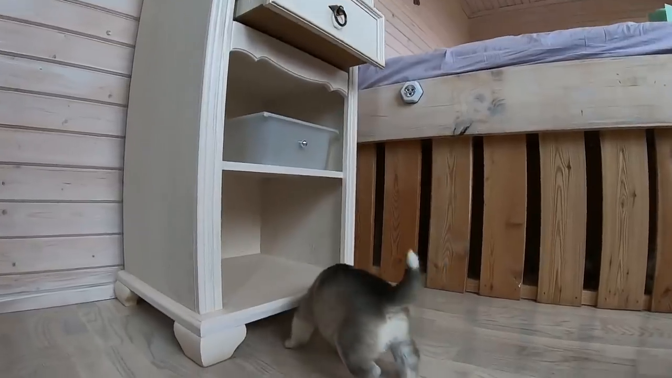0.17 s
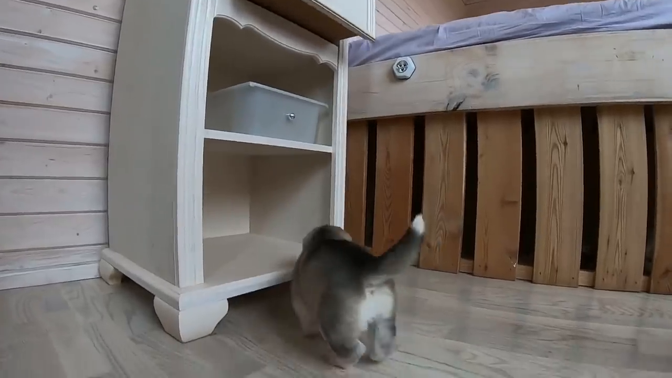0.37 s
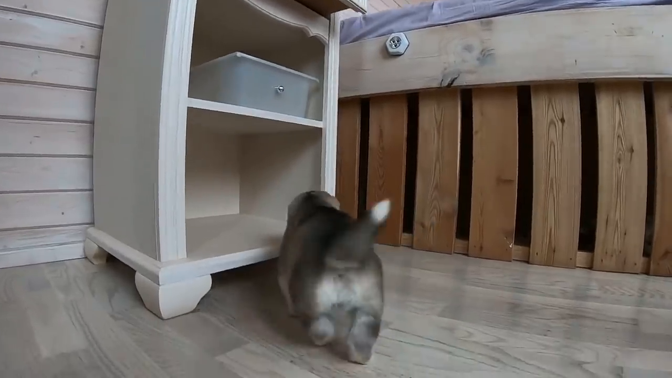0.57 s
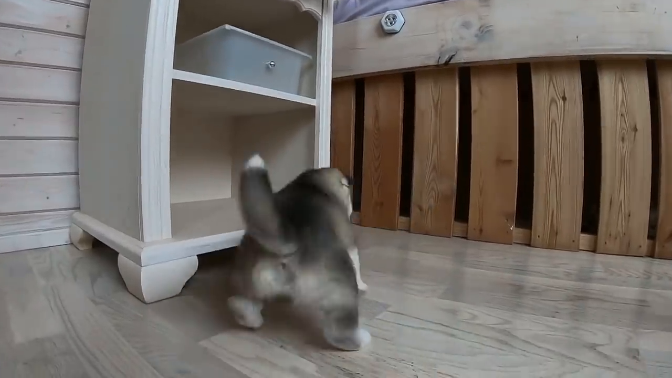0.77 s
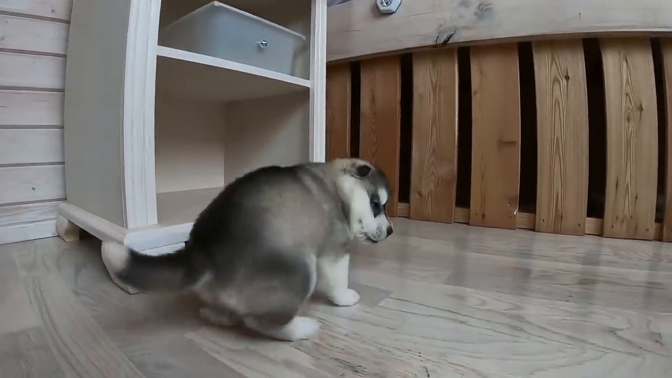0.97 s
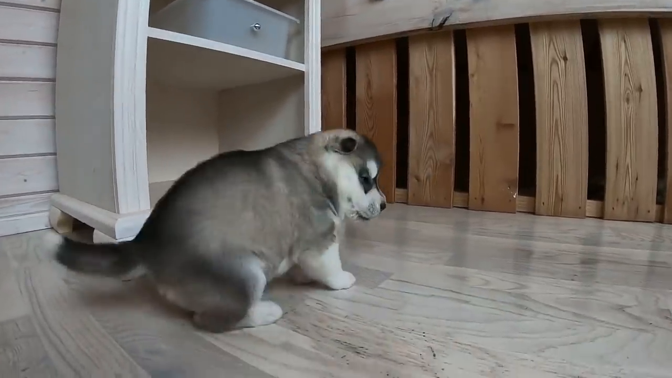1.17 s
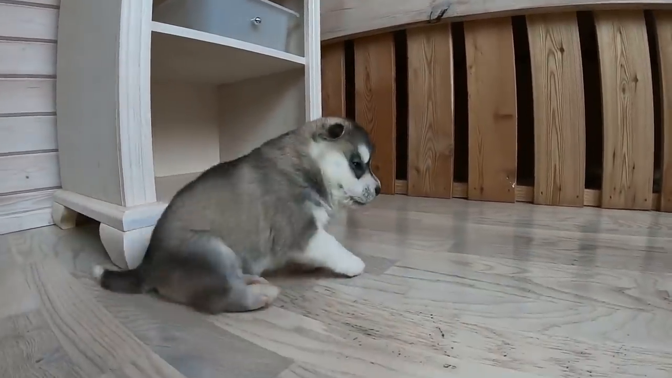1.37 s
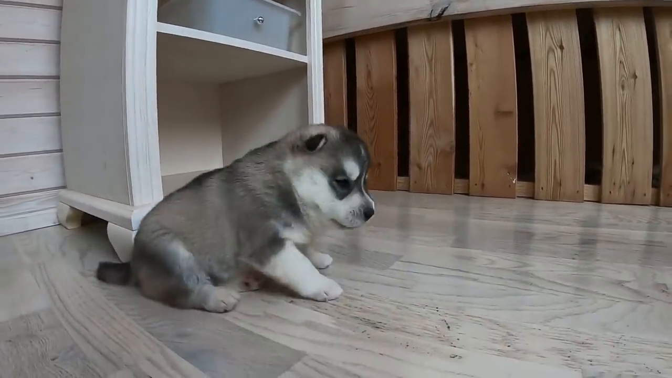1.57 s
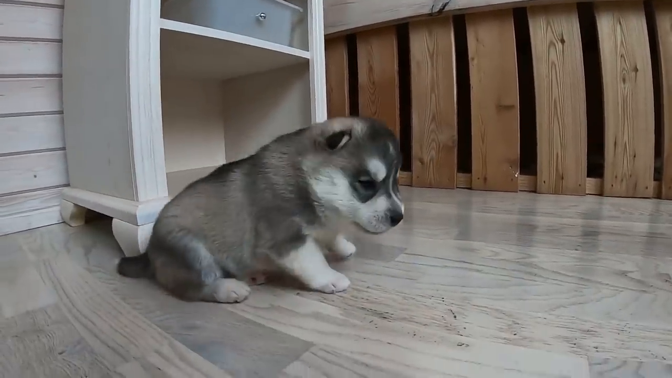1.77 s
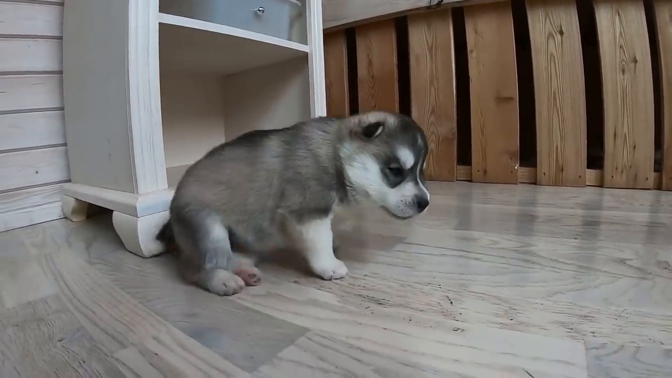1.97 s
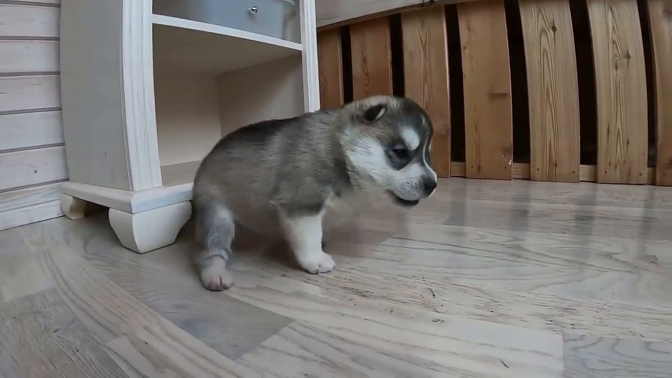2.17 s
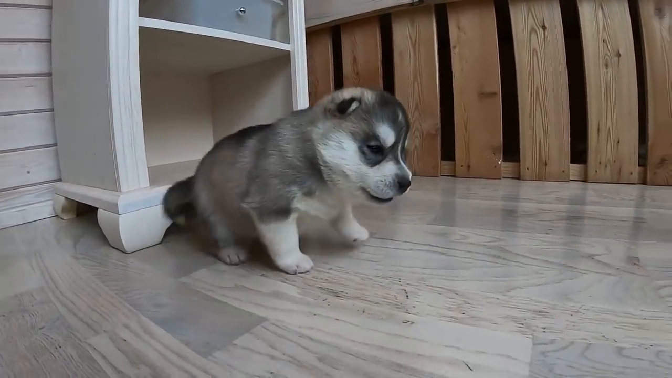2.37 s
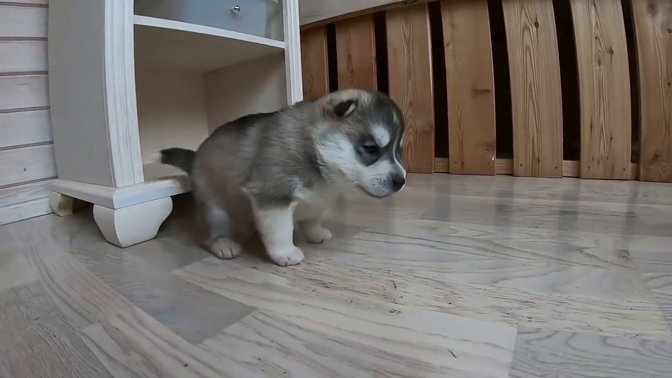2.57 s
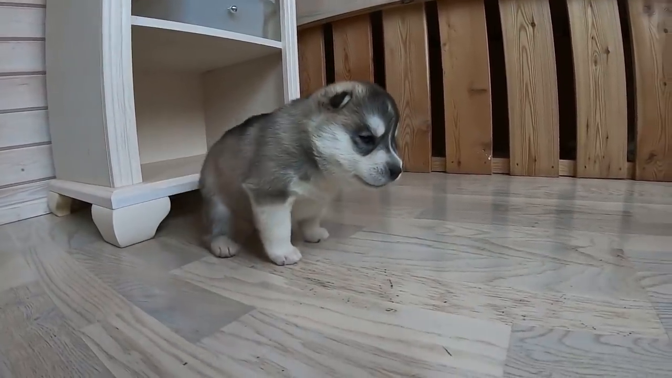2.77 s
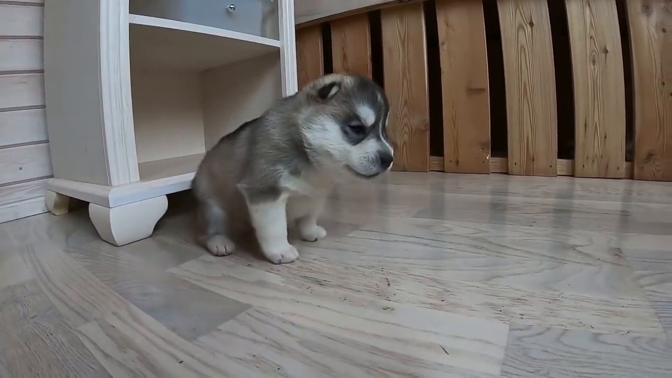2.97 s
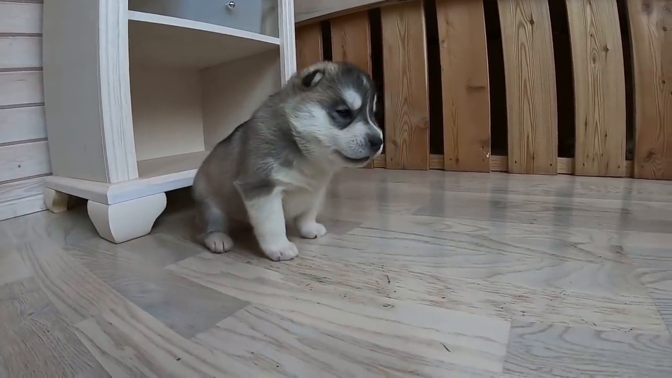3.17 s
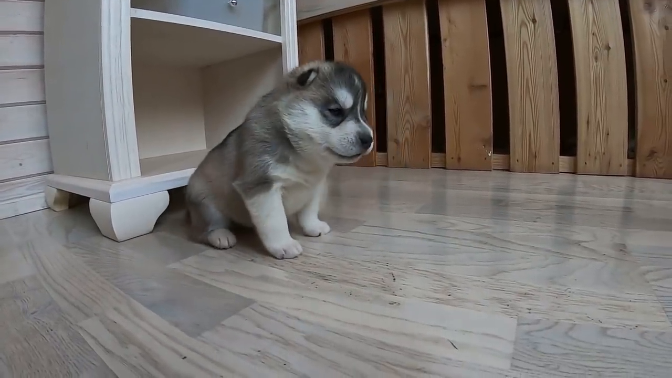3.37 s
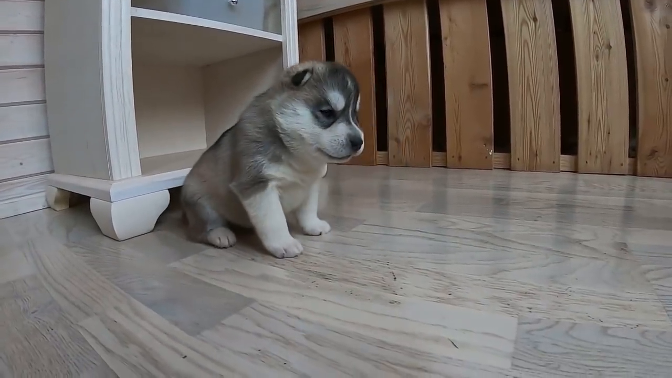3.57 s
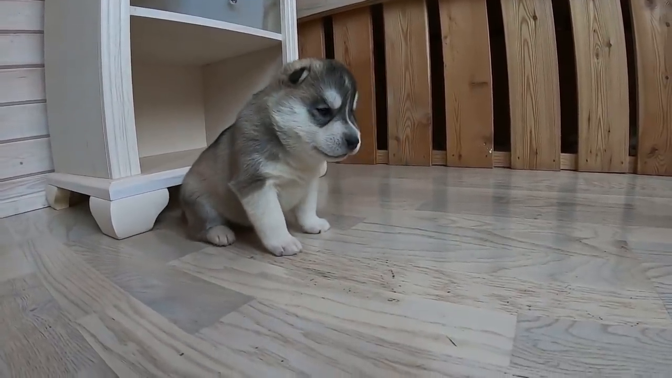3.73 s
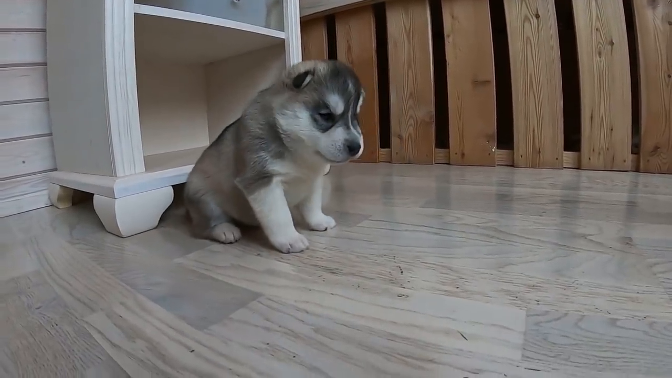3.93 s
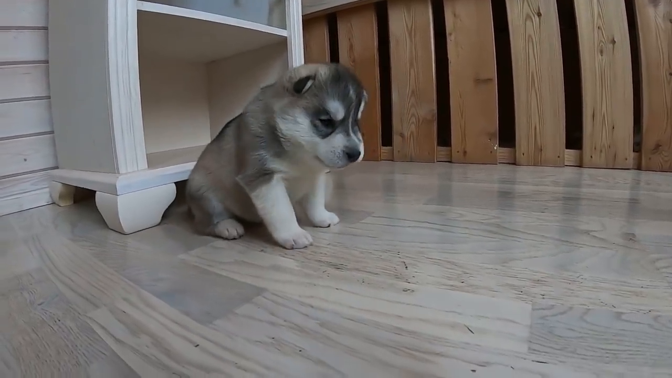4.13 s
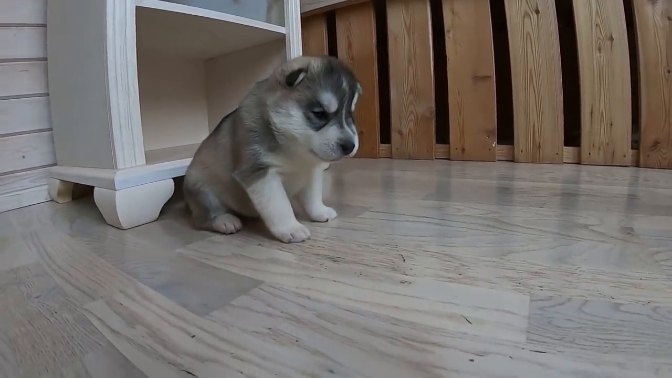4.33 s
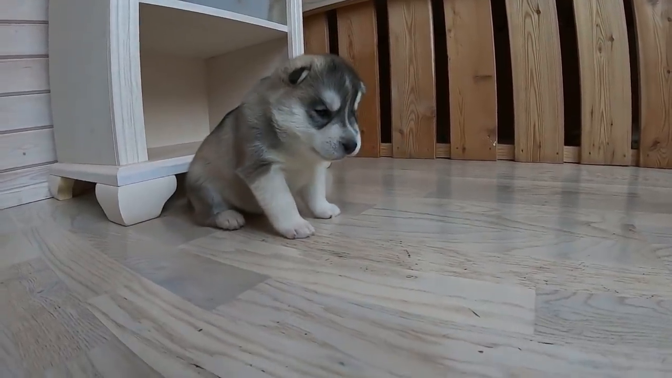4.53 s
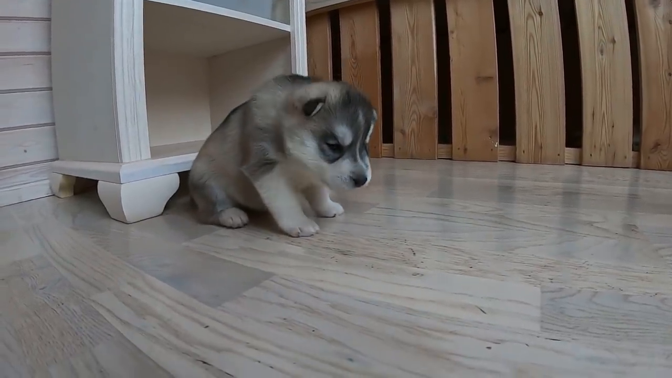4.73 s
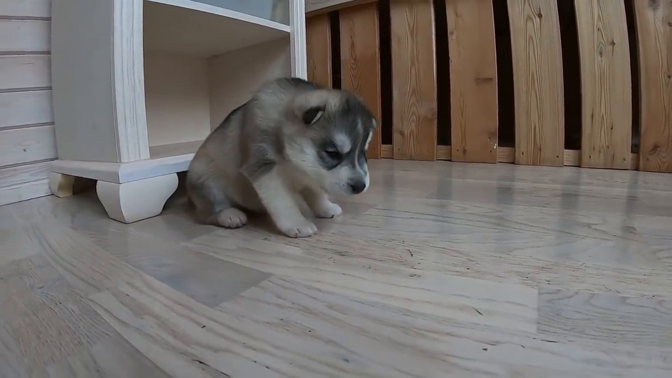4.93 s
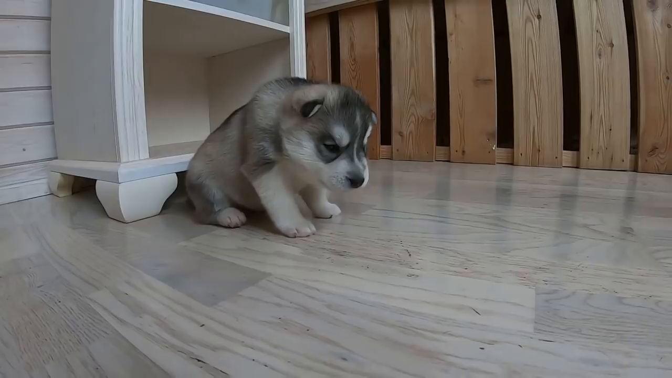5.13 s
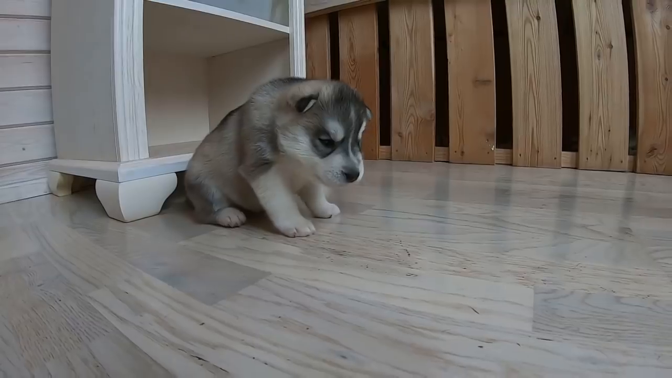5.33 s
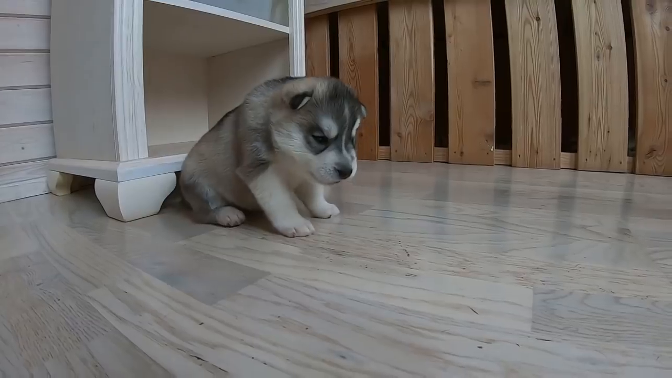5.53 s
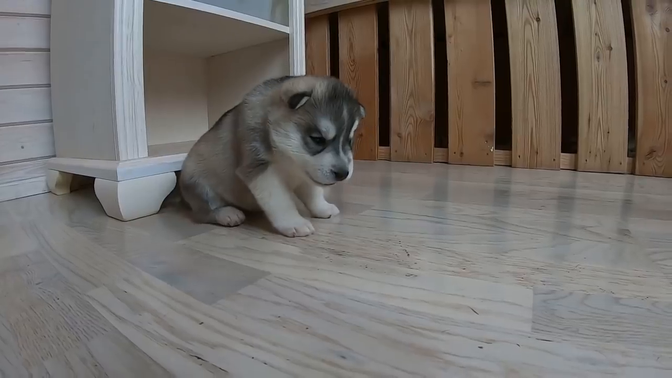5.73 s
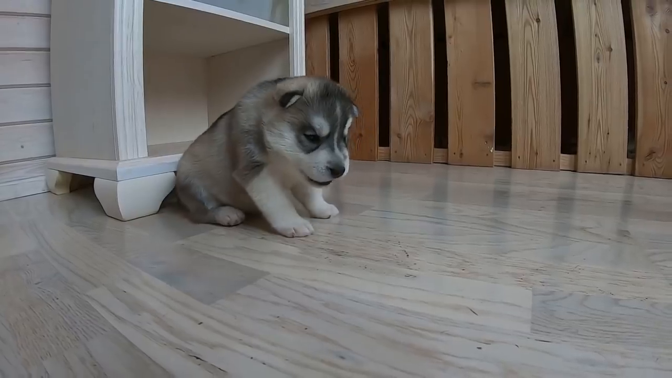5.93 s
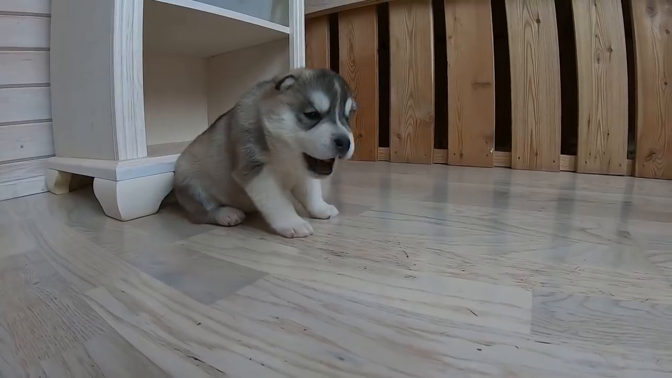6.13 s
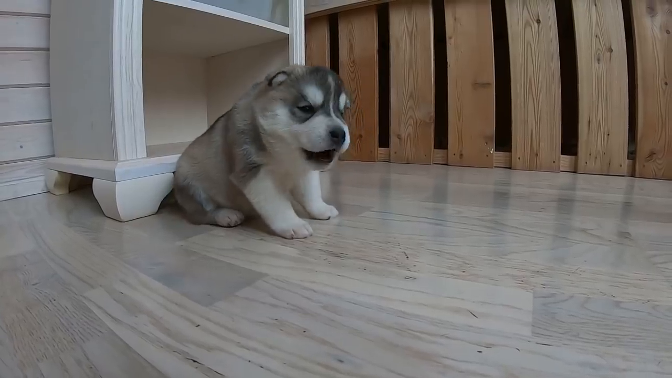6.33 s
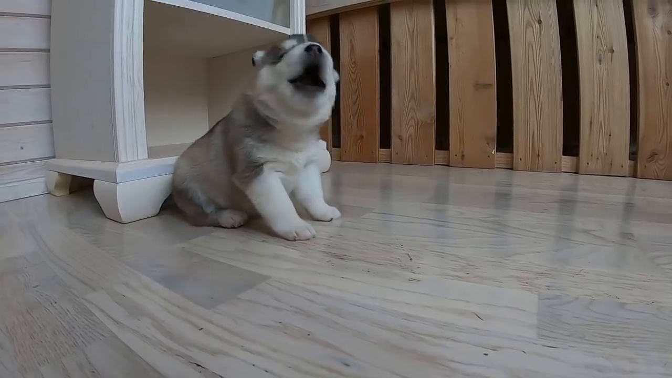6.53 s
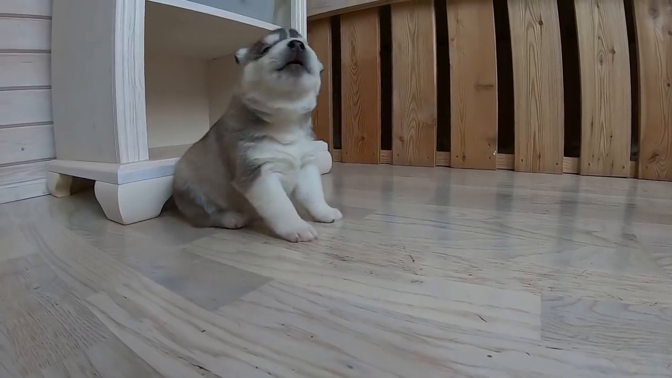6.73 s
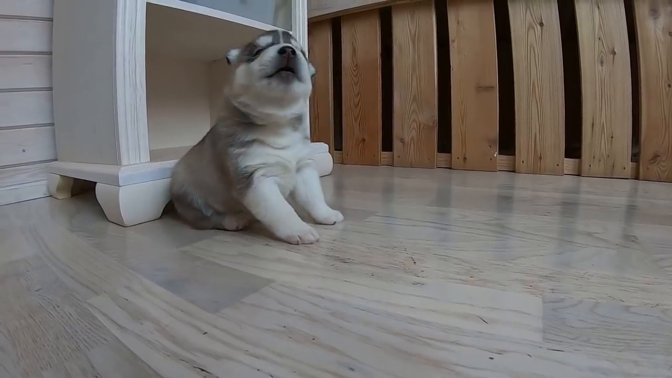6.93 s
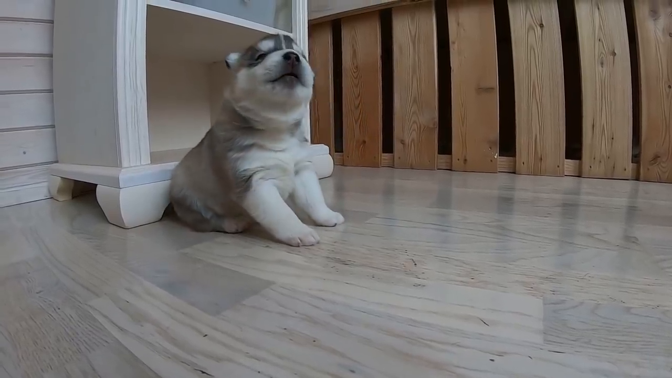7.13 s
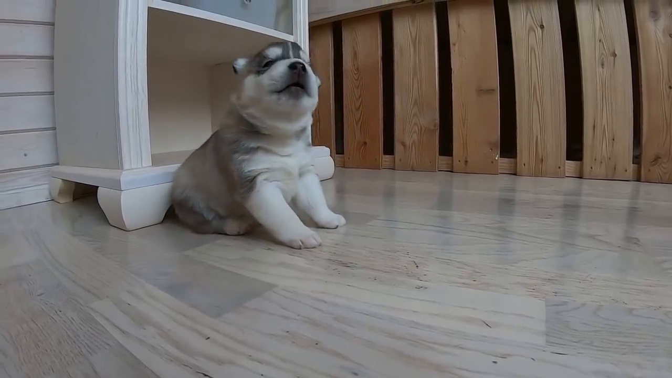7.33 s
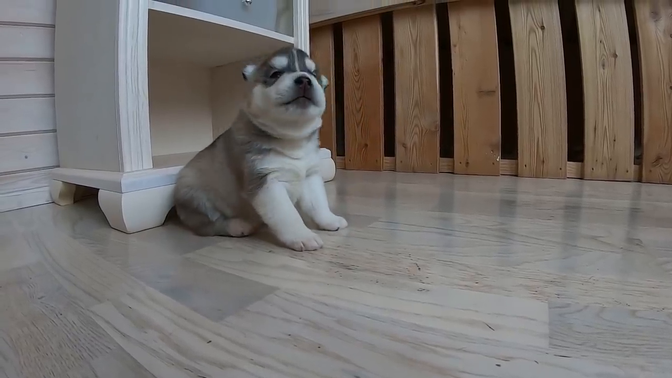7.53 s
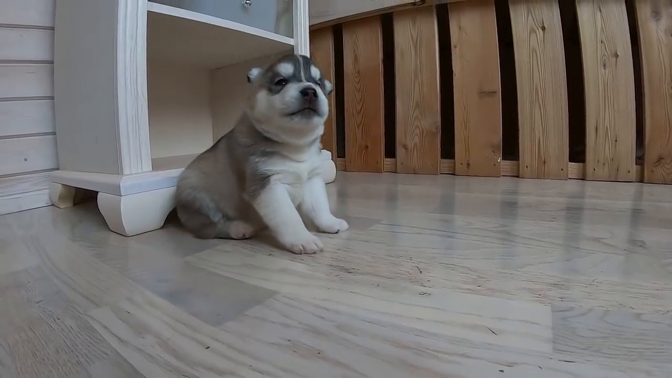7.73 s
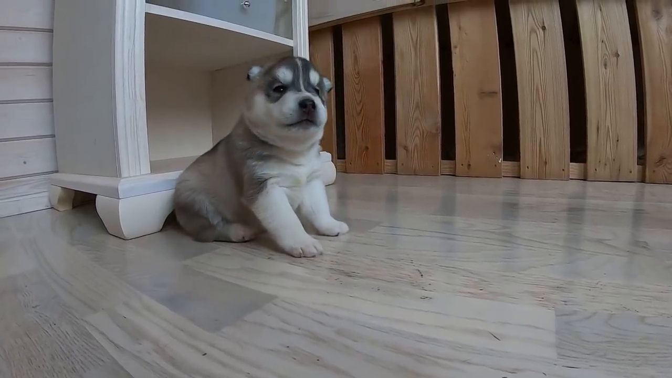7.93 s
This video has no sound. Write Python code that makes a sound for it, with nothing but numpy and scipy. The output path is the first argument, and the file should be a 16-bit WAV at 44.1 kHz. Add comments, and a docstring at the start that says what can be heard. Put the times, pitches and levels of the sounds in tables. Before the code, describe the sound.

A young puppy close to the microphone squeaks in brief, thin, gliding whistles with breathy edges. Soft body and fur rubbing runs throughout on a wooden floor. Early squeaks mingle with dull pad pats and thumps; after a pause in the voice, a hind leg beats quickly and softly on the boards. Louder, piercing squeaks follow, then darker ones with claw taps. The small panelled room adds a short, quiet reverberation.

```python
"""Fur and body rub a wooden floor throughout; from 0.4 s a small puppy squeaks close by in a panelled room.
Each squeak is a gliding, nearly pure whistle with faint overtones, wrapped in airy noise with a puff at its end.
Between squeaks come noise-burst pats and claw taps, swishes of noise, and thumps from decaying board modes.
From 4.7 s a hind leg beats strong and weak strokes, and from 5.1 s a pad judders as chopped noise.
At 6.6 s the muzzle lifts: later squeaks darken and lose air, and the voice drifts from right to left."""
import sys
import numpy as np
from scipy import signal
from scipy.fft import rfft, irfft, next_fast_len
from scipy.io import wavfile
from scipy.ndimage import uniform_filter1d

SR = 44100
rng = np.random.default_rng(int(sys.argv[2]) if len(sys.argv) > 2 else 0)


def generate_wav(signal):
    """Clip the signal to [-1, 1] and save it as 16-bit WAV at the path in sys.argv[1]."""
    frames = np.transpose(np.atleast_2d(signal))
    scaled = np.clip(frames, -1, 1) * 32767
    pcm = np.round(scaled).astype(np.int16)
    wavfile.write(sys.argv[1], SR, pcm)


N = 356811

# Body shifting on the floor, before the rub and fur trims: (time [s], level [dB])
BODY_MOTION = [(.6, -67), (2.9, -71), (3.65, -66), (4.05, -77.5), (4.45, -67.5), (5.5, -64), (7.5, -55),
               (7.75, -68)]
# Colour of the body rubbing the boards: (frequency [Hz], relative level [dB])
RUB_COLOUR = [(30, -11), (100, -4), (180, 7.5), (480, -4), (1200, 1), (7000, -13.5), (12000, -40.5)]
# How far the rub differs between left and right: (frequency [Hz], side against middle [dB])
RUB_WIDTH = [(250, -13), (600, 0), (3000, -5)]
# Colour of rushing air, also used for fur: (frequency [Hz], relative level [dB])
AIR_COLOUR = [(500, -11), (1500, -1), (5000, -4), (7200, -4.5), (9800, 0.5), (11800, -21.5)]
# Squeaks, one curve each, before waver and flare: (time [s], pitch [Hz], effort [dB], overtone level [dB])
SQUEAK_CURVES = [
    [(.362, 1590, -55, -87), (.42, 1760, -65, -83), (.515, 1465, -70, -77)],
    [(.758, 1694, -39, -70), (.825, 2350, -62, -84), (.852, 1930, -43, -78), (.897, 1684, -39, -54),
     (.905, 1528, -38, -58), (.932, 1518, -32, -62)],
    [(1.235, 1030, -46, -56), (1.276, 1190, -48, -50), (1.288, 1557, -38, -58), (1.308, 1645, -38, -62),
     (1.385, 1328, -39, -52), (1.412, 1400, -35, -59), (1.435, 1372, -56, -73), (1.47, 1423, -36, -60),
     (1.492, 994, -50, -51)],
    [(1.727, 1458, -34, -47), (1.767, 1840, -31, -60), (1.815, 1755, -53, -81), (1.835, 1485, -35, -56)],
    [(2.227, 2274, -22, -26), (2.255, 2203, -14.5, -34), (2.27, 2100, -22, -38), (2.281, 1560, -41, -66)],
    [(2.462, 1310, -33, -34), (2.49, 1639, -30, -37), (2.55, 1979, -42, -78), (2.595, 1654, -31, -48),
     (2.626, 1566, -32, -49)],
    [(3.083, 2024, -44, -74), (3.142, 2307, -45, -62), (3.185, 2019, -41, -60), (3.205, 1421, -36, -57)],
    [(3.463, 1520, -43, -55), (3.511, 1570, -35, -56)],
    [(5.16, 1605, -72, -88), (5.212, 1617, -35, -65), (5.232, 1523, -34, -67)],
    [(5.658, 2431, -39, -69), (5.708, 2306, -44, -69), (5.738, 1521, -24, -62)],
    [(6.025, 2440, -14, -33), (6.062, 2462, -15, -33), (6.09, 2660, -27, -35), (6.187, 2530, -27, -37),
     (6.21, 2096, -22, -54)],
    [(6.453, 1859, -31, -31), (6.484, 1940, -25, -21), (6.496, 2225, -20, -22), (6.511, 2288, -19, -23),
     (6.533, 2240, -18, -36), (6.548, 2552, -32, -54), (6.652, 1955, -35, -63)],
    [(6.881, 1558, -42, -35), (6.914, 1798, -23, -41), (6.938, 2230, -35, -72), (6.965, 2096, -70, -90),
     (6.988, 1980, -36, -62), (7.13, 1695, -46, -62), (7.155, 1303, -48, -46)],
    [(7.336, 1497, -37, -41), (7.374, 1746, -30, -35), (7.397, 2110, -37, -55), (7.48, 1678, -43, -50),
     (7.57, 1532, -45, -54), (7.607, 1352, -46, -66)],
]
# Colour of the overtones before the muzzle lifts: (frequency [Hz], gain [dB])
OVERTONE_COLOUR = [(2650, -16), (3300, -9), (3800, 4), (4300, 7), (5200, 6), (6000, -9), (8000, -8),
                   (12000, -20)]
# Coat sweeping the floor, level before the swell: (middle time [s], length [s], level [dB])
COAT_BRUSHES = [(.58, .25, -60), (3.68, .36, -62)]
# Dull pats of the pads: (time [s], nominal peak level [dB])
PAD_PATS = [(0.5585, -38), (1.0849, -39), (1.5958, -37), (2.0257, -33), (4.669, -40)]
# Colour of a pat: (frequency [Hz], relative level [dB])
PAT_COLOUR = [(150, -6), (800, 0), (7000, -19), (12000, -36)]
# Sharper claw taps: (time [s], nominal peak level [dB])
CLAW_TAPS = [(3.278, -39), (6.7736, -32), (7.1835, -35), (7.2105, -37), (7.196, -25), (7.2225, -33),
             (7.2375, -35), (7.7113, -35)]
# Colour of a claw tap: (frequency [Hz], relative level [dB])
CLAW_COLOUR = [(1800, -5), (3100, 6), (4300, -14), (6500, -10), (12000, -38)]
# Fur swishes and dull rumbles, with the puppy's breaths and sniffs from 4.28 to 5.49 s, level before the swell:
# (middle time [s], length [s], level [dB], centre frequency [Hz])
NOISE_SWISHES = [(1.01, .1, -47, 68), (1.621, .079, -51.5, 200), (2.661, .34, -53.5, 260),
                 (2.769, .092, -46, 220), (3.6, .11, -57, 215), (4.45, .15, -60, 1500),
                 (4.28, .13, -56.5, 3000), (4.87, .09, -51.5, 2600), (5.49, .09, -55, 3400),
                 (7.0, 1.3, -57, 130), (7.205, .07, -42, 300)]
# Single paws and the rump landing on the boards: (time [s], peak level [dB])
PAW_THUMPS = [(1.476, -43.5), (2.286, -43.5), (4.452, -42), (4.668, -37.5), (7.529, -41.5), (7.736, -48),
              (7.945, -50)]
# Ringing modes of the floor, detuned at each thump: (frequency [Hz], relative level [dB], t60 [s])
BOARD_MODES = [(67, -7, .15), (157.7, 0, .11), (183, -6, .1), (310, -13, .08)]
# Force of the leg's strong strokes: (time [s], peak level [dB])
LEG_FORCE = [(4.73, -39), (5.27, -34.5), (5.64, -37), (5.82, -45), (6.27, -43)]
# Pad sticking and slipping, level before swell and chopping: (middle time [s], length [s], level [dB])
PAD_JUDDERS = [(5.36, .44, -56), (6.392, .16, -57.5), (7.212, .08, -51)]
# How fast the panelled room dies away: (frequency [Hz], t60 [s])
ROOM_DECAY = [(2000, .29), (12000, .22)]

EDGE_HZ = 15400  # top of the audible band here
LET_GO_S = .025  # the folds let go over the end of each squeak
FLARE_HZ, FLARE_WIDTH_HZ, FLARE_BOOST = 1630, 130, 3  # the whistle flares louder as its pitch passes near this
PURITY = 2.2  # overtones fall off by this power of their number
FULL_FLOW_DB, FULL_EFFORT_DB = -50.3, -15  # reference airflow and effort of a hard cry
FLOW_PER_EFFORT, LEAST_FLOW_DB = .44, -61  # dB per dB; lowest flow before the muzzle's drop
# The muzzle lifts and the overtone colour shifts down by this ratio; the air drops
LIFT_S, LIFT_LENGTH_S, LIFTED_COLOUR_SHIFT, LIFTED_FLOW_DB = 6.6, .25, .75, -13
PAN_DB, LIFTED_PAN_DB = -1.6, 2  # left minus right: until the lift, and at the end of the drift
BEAT_START_S, BEAT_PERIOD_S, WEAK_BEAT_DB = 4.732, .0902, -9


def gain_of(db):
    """Turns decibels into an amplitude factor."""
    return 10 ** (np.asarray(db) / 20)


def evened(x):
    """Brings a sound to unit RMS level."""
    return x / np.sqrt(np.mean(x ** 2) + 1e-20)


def read(points, hz):
    """Reads a spectrum joined by straight lines over log frequency."""
    f, value = np.transpose(points)
    return np.interp(np.log(hz + 1), np.log(f), value)


def add(mix, s, sound):
    """Lays a sound into the mix at time s."""
    part = mix[max(round(s * SR), 0):][:len(sound)]
    part += sound[:len(part)]


def noise(colour, size):
    """Noise of unit level with the given colour."""
    white = rfft(rng.standard_normal(size))
    hz = np.fft.rfftfreq(size, 1 / SR)
    return evened(irfft(white * gain_of(read(colour, hz)), size))


def wander(size, hz):
    """Random drift up to about hz, from one second of unit-level smoothed noise."""
    f = np.fft.rfftfreq(SR, 1 / SR)
    smooth = rfft(rng.standard_normal(SR)) / (1 + (f / hz) ** 4)
    return evened(irfft(smooth))[:size]


def pair(colour, apart):
    """Stereo noise, partly shared; apart is (frequency [Hz], side against middle [dB])."""
    size = next_fast_len(N, real=True)
    hz = np.fft.rfftfreq(size, 1 / SR)
    shared, side = rfft(rng.standard_normal((2, size))) * gain_of(read(colour, hz))
    side = side * gain_of(read(apart, hz))
    left_right = irfft(np.array([shared + side, shared - side]), size)
    return evened(left_right[:, :N])


def shuffle(rub_db=-2, fur_db=-10, grain_db=3.2, fur_follow=.35):
    """The body rubs the boards and fur brushes them, now and then catching sharply."""
    t = np.arange(N) / SR
    s, motion_db = np.transpose(BODY_MOTION)
    steps = np.arange(0, t[-1], .005)
    catches = np.minimum(rng.exponential(1, len(steps)), 4)
    level_db = np.interp(t, s, motion_db) + grain_db * np.interp(t, steps, catches)
    # the fur follows the motion only in part, staying nearer its mean level
    fur_level_db = fur_follow * level_db + (1 - fur_follow) * motion_db.mean()
    rub = pair(RUB_COLOUR, RUB_WIDTH) * gain_of(rub_db + level_db)
    fur = pair(AIR_COLOUR, apart=[(1, 0)]) * gain_of(fur_db + fur_level_db)
    return rub + fur


def airflow(start, effort_db):
    """Harder cries push more air; little escapes once the muzzle is lifted."""
    flow_db = FULL_FLOW_DB + FLOW_PER_EFFORT * (effort_db - FULL_EFFORT_DB)
    return max(flow_db, LEAST_FLOW_DB) + LIFTED_FLOW_DB * (start > LIFT_S)


def air(start, length, flow_db, lead=.07, linger=.2, crest=.8, edge_db=-4,
        rasp_db=5.5, rasp_hz=5200, rasp_growth=1.2, gust_db=2.2):
    """Air leads the whistle, swells with it and lingers; a strong flow rasps in the throat."""
    t = np.arange(-lead, length + linger, 1 / SR)
    swell_times = [t[0], 0, crest * length, length, t[-1]]
    swell = gain_of(np.interp(t, swell_times, [-25, edge_db, 0, edge_db, -38]))
    hiss = np.array([noise(AIR_COLOUR, len(t)) for _ in range(2)])
    rasp_colour = [(rasp_hz / 2, -26), (rasp_hz, 0), (rasp_hz * 1.15, -2),
                   (rasp_hz * 1.4, -22), (rasp_hz * 2, -30)]
    rasp_level_db = rasp_db + rasp_growth * (flow_db - FULL_FLOW_DB)
    # the rasp swells more steeply than the hiss: its own swell and the shared one
    rasp = noise(rasp_colour, len(t)) * swell * gain_of(rasp_level_db)
    gusts = gain_of(flow_db + gust_db * wander(len(t), hz=40))
    return start - lead, gusts * swell * (hiss + rasp)


def squeak(points, jitter=.007, break_jitter=.014, tremble_db=1.4,
           attack=.008, release=.0031, croak=.11):
    """Tight vocal folds whistle on a gliding pitch; slack folds waver more, and croak as they let go."""
    s, *controls = np.transpose(points)
    t = np.arange(s[0] - attack, s[-1] + release, 1 / SR)
    curves = np.array([np.interp(t, s, c) for c in controls])
    hz, effort_db, overtones_db = uniform_filter1d(curves, size=220)  # rounds the corners over 5 ms
    slack = (2000 / hz) ** 2
    breaking = np.clip(1 - (s[-1] - t) / LET_GO_S, 0, 1)
    waver = jitter * slack * wander(len(t), hz=220)
    waver = waver + break_jitter * breaking * slack * wander(len(t), hz=400)
    phase = 2 * np.pi * np.cumsum(hz * (1 + waver)) / SR
    flare = 1 + FLARE_BOOST / (1 + (2 * (hz - FLARE_HZ) / FLARE_WIDTH_HZ) ** 2)
    grain = croak * np.maximum(slack - 1, 0) * wander(len(t), hz=700)
    whistle = flare * np.sin(phase) * gain_of(effort_db) * (1 + breaking * grain)
    edge = overtones(s[0], hz, phase, slack) * gain_of(overtones_db) * (1 + 2 * grain)
    fade = np.interp(t, [t[0], s[0] + attack, s[-1] - release, t[-1]], [0, 1, 1, 0])
    gate = np.sin(np.pi / 2 * fade) ** 2
    tremble = gain_of(tremble_db * slack * wander(len(t), hz=40))
    return t[0], np.sqrt(2) * (whistle + edge) * gate * tremble


def overtones(start, hz, phase, slack, flutter_db=3, fray=.13):
    """Harmonics 2 to 6 of the folds, balanced to an even level and coloured by OVERTONE_COLOUR."""
    k = np.arange(2, 7)[:, None]
    shift = np.interp(start, [LIFT_S, LIFT_S + LIFT_LENGTH_S], [1, LIFTED_COLOUR_SHIFT])
    # slack folds close unevenly, so the overtones trade strength
    drifts = np.array([wander(len(hz), hz=25) for _ in k])
    flutter = gain_of(flutter_db * np.minimum(slack, 2) * drifts)
    colour = gain_of(read(OVERTONE_COLOUR, k * hz / shift))
    weight = flutter * colour / k ** PURITY * (k * hz < EDGE_HZ)
    lines = (weight * np.sin(k * phase)).sum(0) / np.linalg.norm(weight, axis=0)
    # turbulence frays the octave into a harsh skirt of noise, most in the high, tight cries
    skirt = fray / slack * wander(len(hz), hz=800) * np.sin(2 * phase)
    return lines + skirt


def brush(length, level_db):
    """Fur sweeps over the boards in one soft hiss."""
    size = int(length * SR)
    return gain_of(level_db) * np.hanning(size) * noise(AIR_COLOUR, size)


def puff(flow_db, glide_octaves, per_octave_db=14.5, t60=.14):
    """Held air bursts out as the folds let go, stronger the further the pitch glides at the end."""
    t = np.arange(0, t60, 1 / SR)
    decay = gain_of(flow_db + per_octave_db - 60 * t / t60)
    onset = np.minimum(2 * t / LET_GO_S, 1)
    return noise(AIR_COLOUR, len(t)) * glide_octaves * decay * onset


def tap(level_db, colour, t60, crest_db=5):
    """A brief contact with the wood: a burst of noise that dies at once."""
    t = np.arange(SR // 10) / SR
    decay = gain_of(level_db - crest_db - 60 * t / t60)
    return noise(colour, len(t)) * decay * (1 - np.exp(-t / 0.00037))


def swish(length, level_db, hz):
    """A swell of noise about two octaves wide: fur or body sliding on the floor, or a breath."""
    size = int(length * SR)
    colour = [(hz / 3, -40), (hz * .6, -7), (hz, 0), (hz * 2, -15), (hz * 8, -56)]
    return gain_of(level_db) * np.hanning(size) * noise(colour, size)


def thump(level_db, rise=0.0067):
    """A soft paw loads the boards gradually and their modes ring low."""
    t = np.arange(SR // 3) / SR
    ring = np.zeros(len(t))
    for hz, db, t60 in BOARD_MODES:
        turns = hz * rng.uniform(0.9, 1.05) * t + rng.random()
        ring += gain_of(db - 60 * t / t60) * np.sin(2 * np.pi * turns)
    ring = ring * (1 - np.exp(-(t / rise) ** 2))
    return gain_of(level_db) * ring / abs(ring).max()


def leg_beats(count=18, unsteady_s=.003):
    """Nearly even strokes of a hind leg, every second one weaker: (time [s], level [dB])."""
    k = np.arange(count)
    s = BEAT_START_S + BEAT_PERIOD_S * k + unsteady_s * rng.standard_normal(count)
    level_db = np.interp(s, *np.transpose(LEG_FORCE)) + WEAK_BEAT_DB * (k % 2)
    return list(zip(s, level_db))


def judder(length, level_db, slips_per_s=70, hz=1200):
    """The pad sticks and slips, chopping its rubbing noise into a fast patter."""
    rub = swish(length, level_db, hz)
    turns = np.cumsum(slips_per_s * (1 + 0.14 * wander(len(rub), hz=20))) / SR
    return rub * evened(np.exp(-(turns % 1) / 0.12))


def room(x, wet_db, spread, gap=.016):
    """Sparse reflections off the panelling, each band dying at its own speed, partly alike left and right."""
    taps = np.zeros((2, SR))
    at = np.arange(0, SR - 20, 20) + rng.integers(0, 20, (2, (SR - 1) // 20))
    np.put_along_axis(taps, at, rng.choice([-1., 1.], at.shape), 1)
    hz, t, bands = signal.stft(taps, SR, nperseg=256)
    build_up = np.minimum(t / gap, 1) ** 2
    decay = gain_of(-60 * t / read(ROOM_DECAY, hz)[:, None])
    tail = signal.istft(bands * build_up * decay, SR, nperseg=256)[1]
    tail = tail / np.linalg.norm(tail[0])
    mid, side = signal.fftconvolve(x[None], tail, axes=1)[:, :N]
    return gain_of(wet_db) * np.array([mid + spread * side, mid - spread * side])


def scene():
    """The puppy's voice drifting from right to left, over its floor sounds and the room."""
    rubbing = shuffle()
    voice, paws, ticks, air_left, air_right = np.zeros((5, N))
    for points in SQUEAK_CURVES:
        times, hz, effort_db, _ = np.transpose(points)
        start, end = times[0], times[-1]
        flow_db = airflow(start, effort_db.max())
        s, (left, right) = air(start, end - start, flow_db)
        add(air_left, s, left)
        add(air_right, s, right)
        add(voice, *squeak(points))
        glide_octaves = abs(np.log2(np.interp(end - LET_GO_S, times, hz) / hz[-1]))
        add(voice, end - LET_GO_S / 2, puff(flow_db, glide_octaves))
    for s, length, level_db in COAT_BRUSHES:
        add(ticks, s - length / 2, brush(length, level_db))
    for s, level_db in PAD_PATS:
        add(ticks, s, tap(level_db, PAT_COLOUR, t60=.035))
    for s, level_db in CLAW_TAPS:
        add(ticks, s, tap(level_db, CLAW_COLOUR, t60=.014))
    for s, length, level_db, hz in NOISE_SWISHES:
        add(ticks, s - length / 2, swish(length, level_db, hz))
    for s, level_db in list(PAW_THUMPS) + leg_beats():
        add(paws, s, thump(level_db))
    for s, length, level_db in PAD_JUDDERS:
        add(ticks, s - length / 2, judder(length, level_db))
    pan_db = np.interp(np.arange(N) / SR, [LIFT_S, N / SR - 1], [PAN_DB, LIFTED_PAN_DB])
    puppy = (voice + np.array([air_left, air_right])) * gain_of([pan_db / 2, -pan_db / 2])
    echoes = room(voice, wet_db=-12, spread=1.2)
    echoes = echoes + room(ticks, wet_db=-7, spread=.6)
    echoes = echoes + room(paws, wet_db=-15, spread=.5)
    return puppy + paws + ticks + echoes + rubbing


def record(dry):
    """A steep low-pass takes off the treble above EDGE_HZ."""
    low_pass = signal.firwin(511, EDGE_HZ, window=("kaiser", 9), fs=SR)
    return signal.oaconvolve(dry, low_pass[None], "same")


dry = scene()
out = record(dry)
generate_wav(out)
```